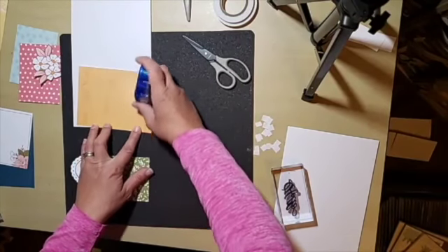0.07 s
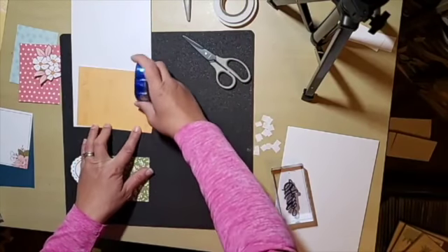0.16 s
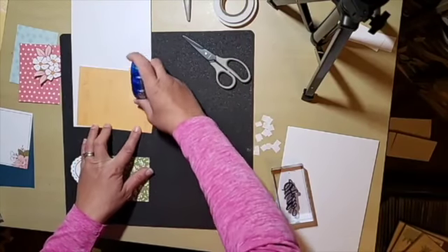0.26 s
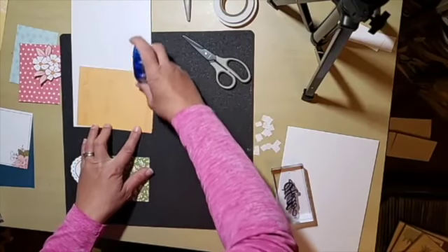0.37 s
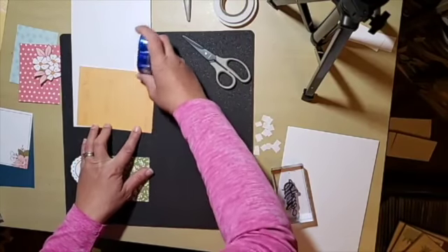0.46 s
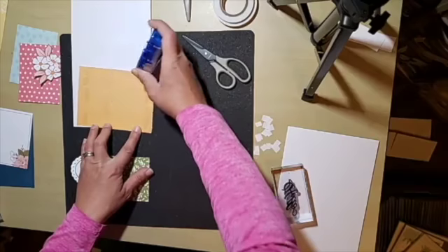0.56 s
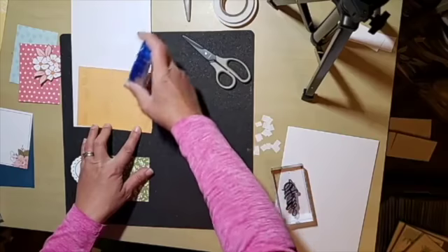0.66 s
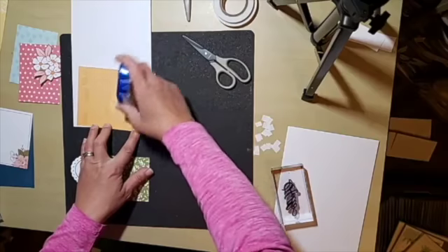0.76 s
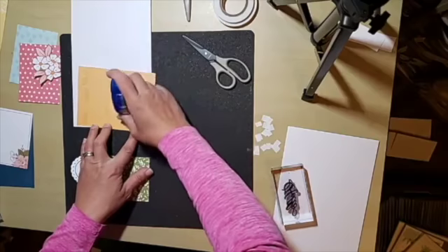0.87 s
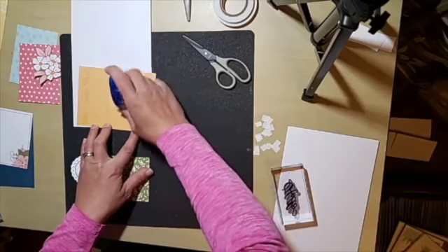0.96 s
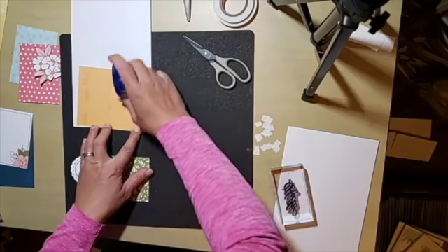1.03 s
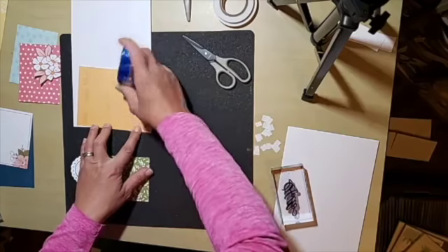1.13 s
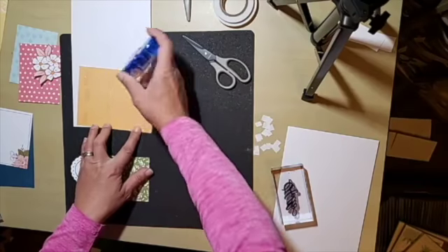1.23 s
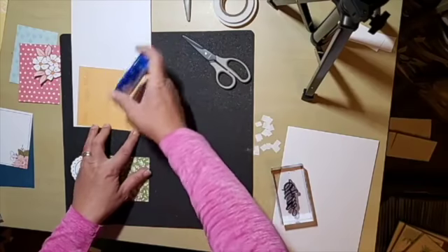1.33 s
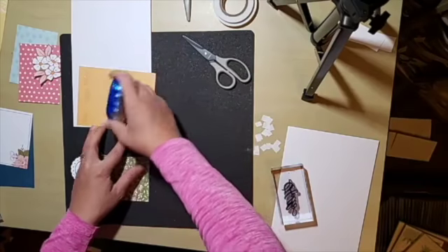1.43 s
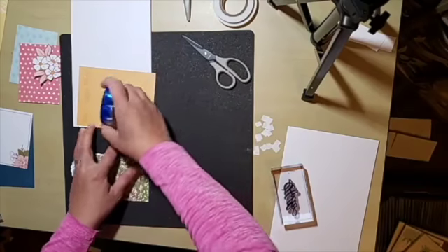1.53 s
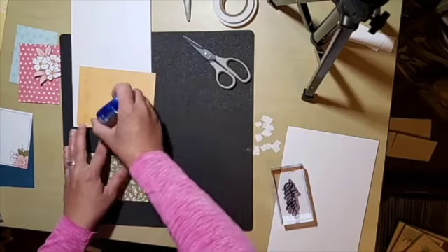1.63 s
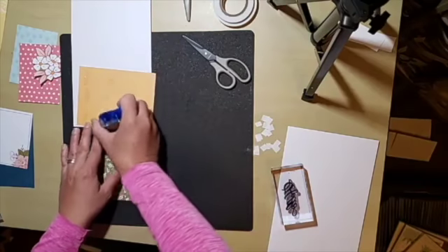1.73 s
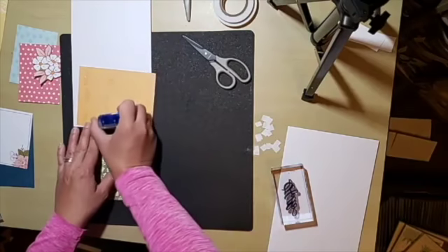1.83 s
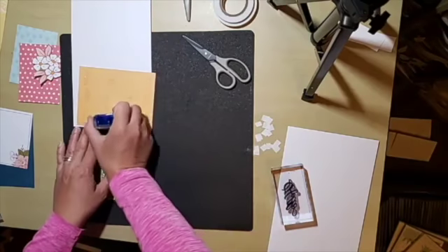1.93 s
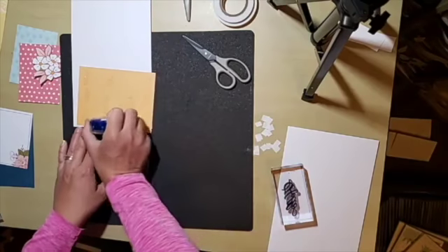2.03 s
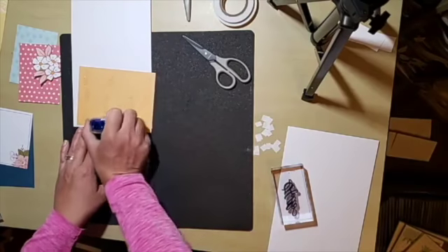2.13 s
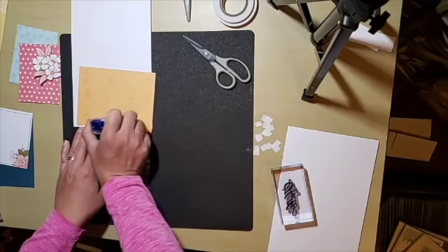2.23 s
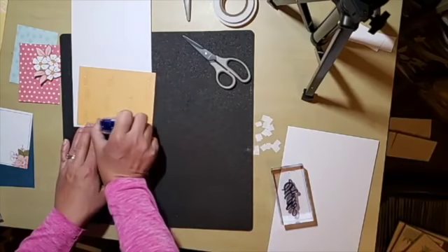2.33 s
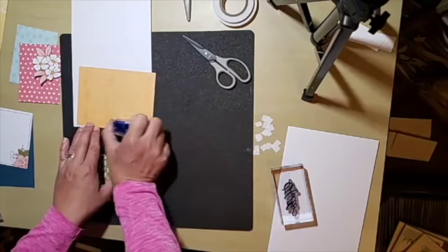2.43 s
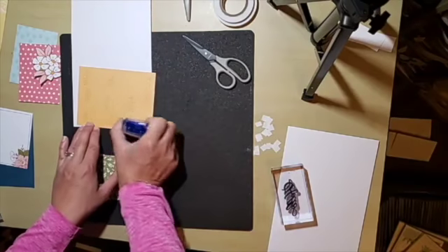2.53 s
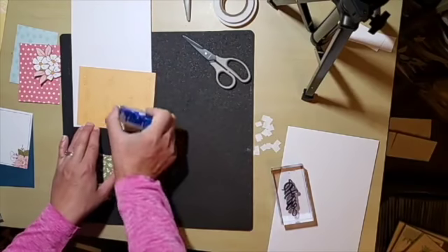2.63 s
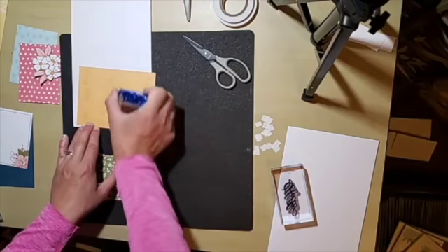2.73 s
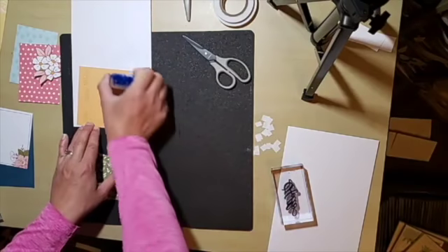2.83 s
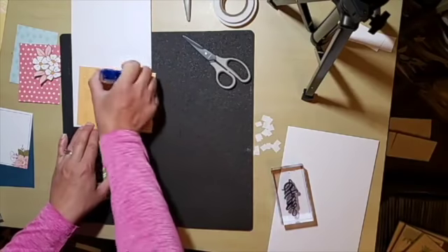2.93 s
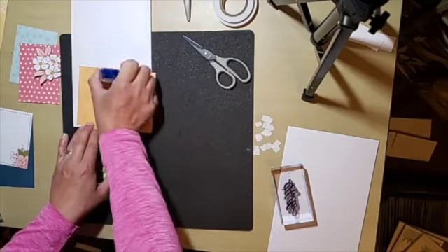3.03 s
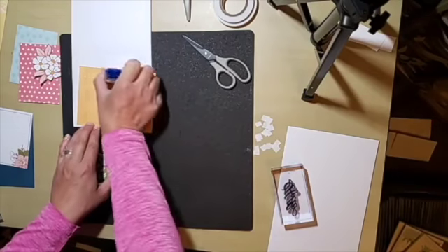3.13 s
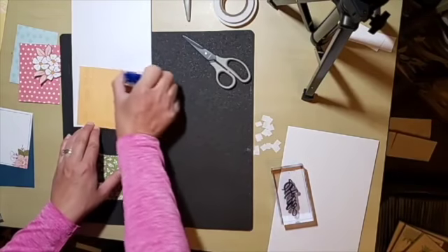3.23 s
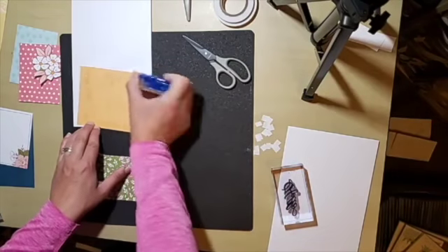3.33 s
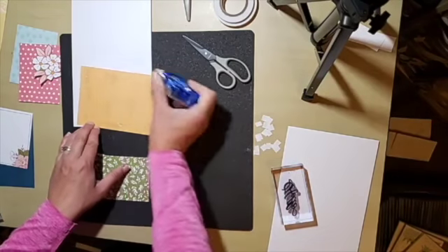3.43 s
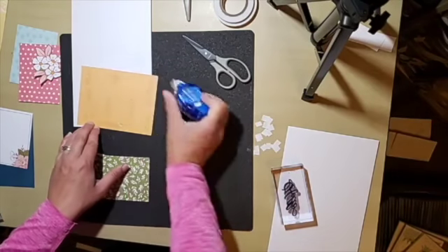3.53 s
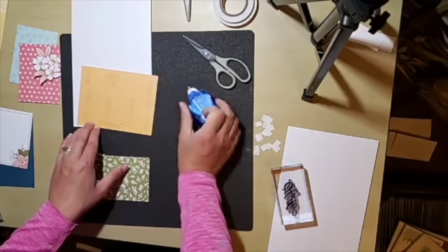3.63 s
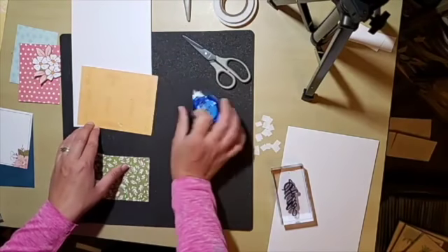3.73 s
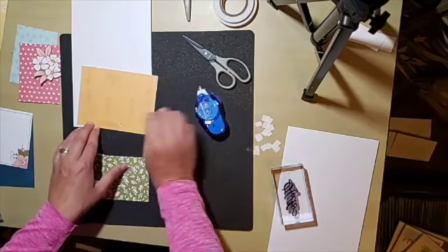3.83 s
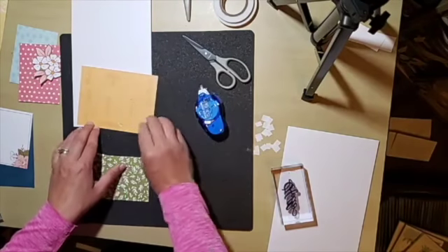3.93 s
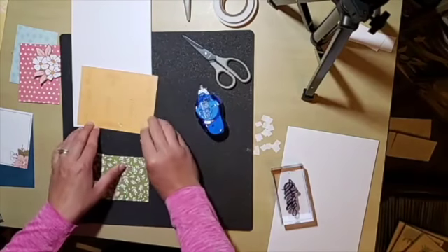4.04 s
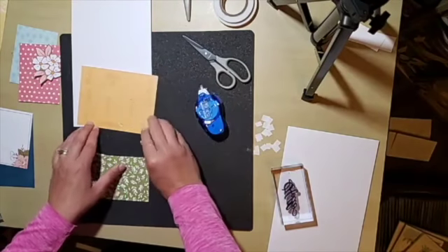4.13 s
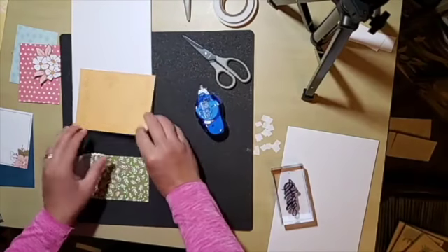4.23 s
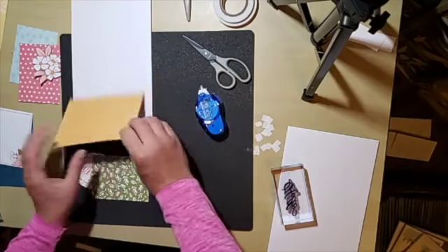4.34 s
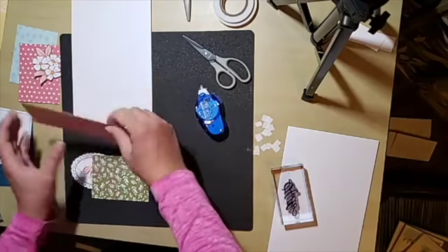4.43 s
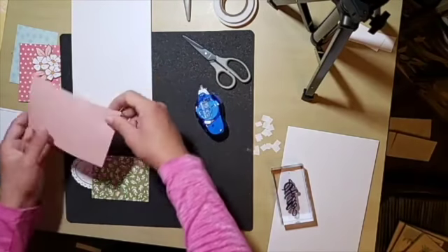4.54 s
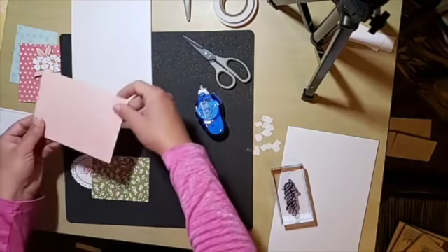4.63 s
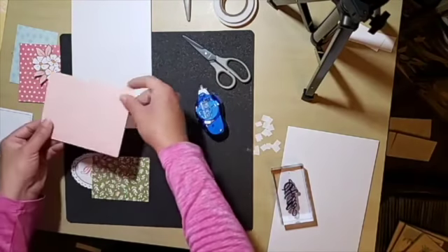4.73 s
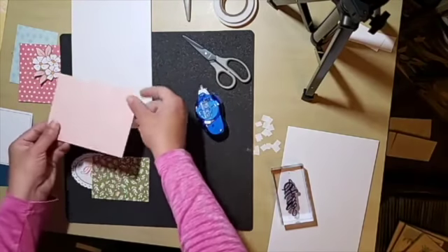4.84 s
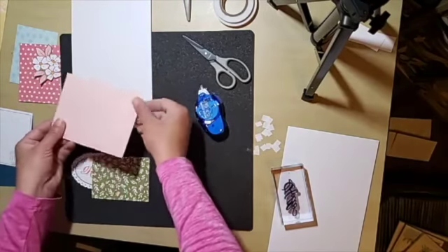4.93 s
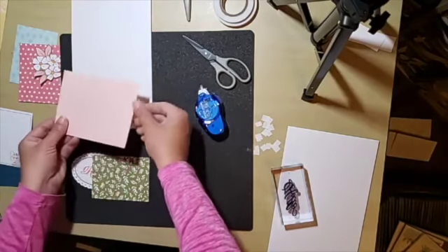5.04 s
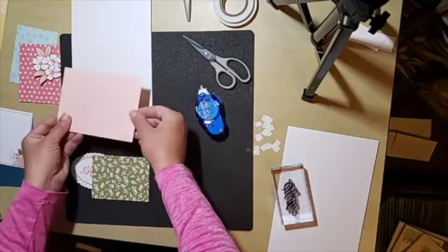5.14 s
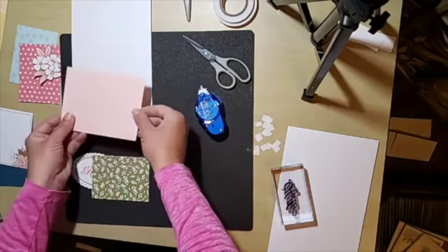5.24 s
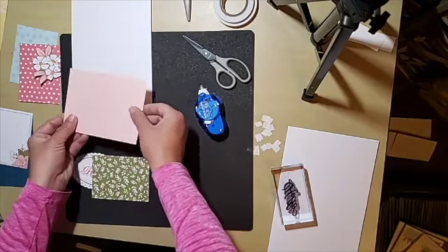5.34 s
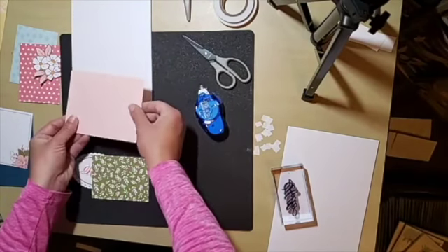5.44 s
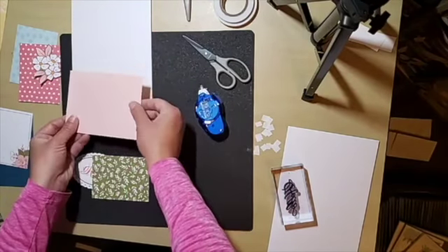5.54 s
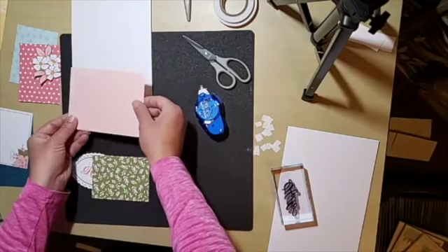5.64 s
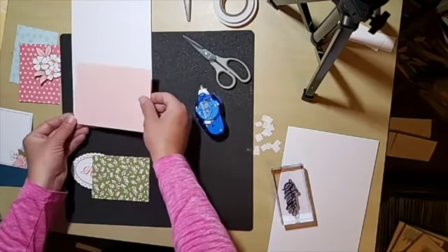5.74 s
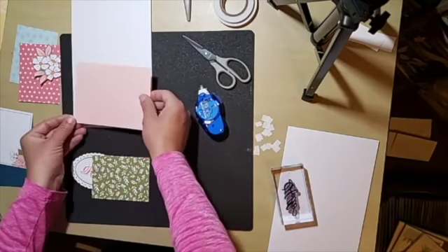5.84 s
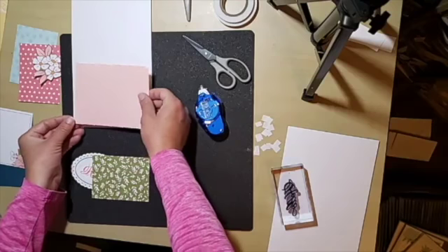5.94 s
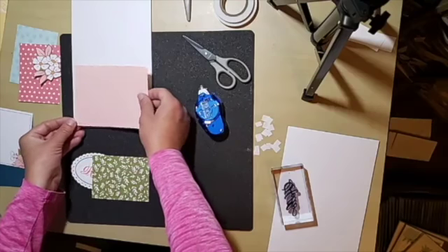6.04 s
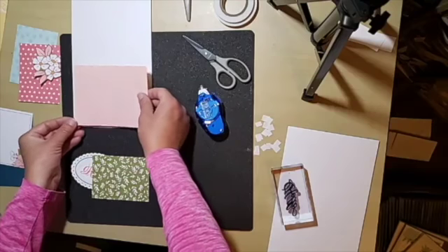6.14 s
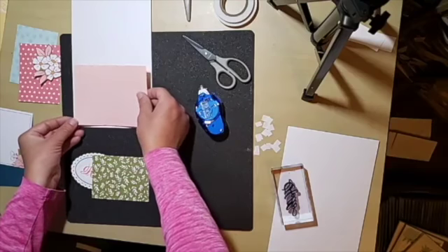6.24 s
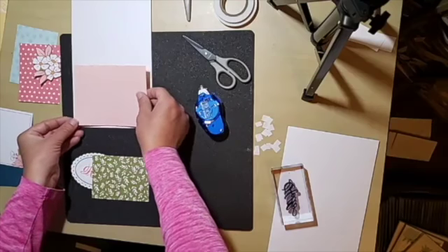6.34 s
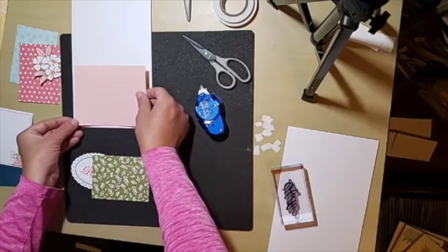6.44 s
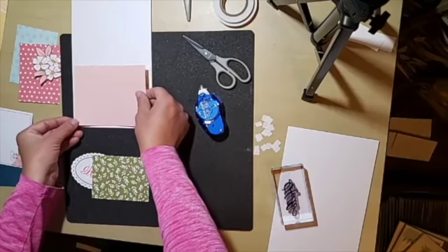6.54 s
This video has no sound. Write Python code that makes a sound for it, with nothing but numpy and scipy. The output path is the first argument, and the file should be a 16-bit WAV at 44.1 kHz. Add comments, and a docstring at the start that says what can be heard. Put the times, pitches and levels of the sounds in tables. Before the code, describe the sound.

Stereo microphones near a craft desk catch four quick zips of an adhesive roller after the tail of another, spaced unevenly, with ticks and rattles of its light plastic body. A firm double knock follows as it lands on the matted desk. Stiff card snaps up, papery rustles and soft slides follow, then almost nothing but low room tone.

```python
"""Tape runner and card on a desk

A plastic tape runner ends one stroke and makes four more along the edges of a card, in a small room.
Noise grains make the rasping gears and snapping glue; resonant bursts make roller squeaks and card flaps.
Struck modes make the case clicks and desk thumps. The card rubs as shaped friction noise and a hum."""
import sys
import numpy as np
from scipy import signal
from scipy.fft import rfft, irfft
from scipy.io import wavfile
from scipy.ndimage import uniform_filter1d

SR = 44100
rng = np.random.default_rng(int(sys.argv[2]) if len(sys.argv) > 2 else 0)


def master_out(mix):
    """Clip the mix to full scale and print it as 16-bit PCM to the path in sys.argv[1]."""
    frames = np.transpose(np.atleast_2d(mix))
    ceiling = np.clip(frames, -1, 1)
    pcm = np.round(ceiling * 32767).astype(np.int16)
    wavfile.write(sys.argv[1], SR, pcm)


N = 290619
TIME = np.arange(N) / SR   # s


def amp(db):
    """Decibels to gain."""
    return 10 ** (np.asarray(db) / 20)


def unit(x):
    """Scale to rms 1."""
    return x / np.sqrt(np.mean(x ** 2) + 1e-20)


def at_hz(points, hz):
    """Read a table on a log-frequency axis."""
    f, value = np.transpose(points)
    return np.interp(np.log(np.maximum(hz, 1)), np.log(f), value)


def colour(x, spectrum, size=8192):
    """Causal (minimum-phase) filter that keeps the power of white noise."""
    gain = unit(amp(at_hz(spectrum, np.linspace(0, SR / 2, size // 2 + 1))))
    cepstrum = irfft(np.log(gain))
    # fold the cepstrum to its causal half
    cepstrum[1:size // 2] *= 2
    cepstrum[size // 2 + 1:] = 0
    impulse_response = irfft(np.exp(rfft(cepstrum)))
    return signal.fftconvolve(x, impulse_response)[:N]


def high_pass(x, order, hz):
    """Butterworth high-pass."""
    return signal.sosfilt(signal.butter(order, hz, "high", fs=SR, output="sos"), x)


def ring(x, hz, t60_s):
    """Two-pole resonance: a unit click sets a decaying sine of initial height 1 ringing."""
    radius = np.exp(-np.log(1000) / (t60_s * SR))
    angle = 2 * np.pi * hz / SR
    poles = [1, -2 * radius * np.cos(angle), radius * radius]
    return signal.lfilter([0, np.sin(angle)], poles, x + 1e-18)


def band_noise(hz, width, size, order=1):
    """Noise in one resonance of the given relative width; rms 1."""
    edges_hz = [hz / (1 + width / 2), hz * (1 + width / 2)]
    sos = signal.butter(order, edges_hz, "band", fs=SR, output="sos")
    return unit(signal.sosfilt(sos, rng.standard_normal(size)))


def burst(shape, hz, width, order):
    """Resonant noise under an envelope, carrying exactly the envelope's energy."""
    noise = band_noise(hz, width, len(shape), order)
    return unit(shape * noise) * np.sqrt(np.mean(shape ** 2))


def grains(per_s, spread_db):
    """Tiny snaps at random moments, of random size and sign; rms 1."""
    sizes = amp(spread_db * np.clip(rng.standard_normal(N), -2, 2))
    signs = rng.choice([-1, 1], N)
    return unit(sizes * signs * (rng.random(N) < per_s / SR))


def drift(per_s):
    """Straight lines between normal random values drawn per_s times a second."""
    return np.interp(TIME * per_s, np.arange(N // 20), rng.standard_normal(N // 20))


def strikes(s, db):
    """One-sample blows at the given times."""
    out = np.zeros(N)
    out[np.round(np.asarray(s) * SR).astype(int)] = amp(db)
    return out


def add(out, s, sound):
    """Mix a short sound in from time s."""
    start = max(round(s * SR), 0)
    out[start:start + len(sound)] += sound[:N - start]


def glide(start_s, end_s, attack_s, release_s):
    """Speed of a stroke, 0-1: the hand eases in, holds its pace and eases out."""
    share = np.minimum((TIME - start_s) / attack_s, (end_s - TIME) / release_s)
    return np.sin(np.pi / 2 * np.clip(share, 0, 1))


PRESS_POWER = 1.59   # gain grows as this power of the pressure


def press(start_s, hardest_s, end_s):
    """Gain of a touch whose pressure grows evenly and is evenly let go."""
    return np.interp(TIME, [start_s, hardest_s, end_s], [0, 1, 0]) ** PRESS_POWER


def pan(x, left_db):
    """Lift the left side and cut the right by left_db."""
    return x * amp([[left_db], [-left_db]])


# relative noise floor spectrum: pitch_hz, level_db
FLOOR_COLOUR = [(15, -17), (32, 7.5), (55, 0), (90, -4), (125, -4), (190, -13), (320, -12.5), (500, -16),
                (1700, -18.5), (2800, -16.5), (6700, -22), (9000, -30.5), (13000, -17), (16000, -21.5)]
# mains hum: pitch_hz, rms_db
MAINS_HUM = [(59.5, -74.5), (119, -81.5)]
FLOOR_DB = -64


def background(side_db=-5):
    """Room rumble and hiss as coloured stereo noise, mains hum as steady sines."""
    mid, side = (colour(white, FLOOR_COLOUR) for white in rng.standard_normal((2, N)))
    hum = sum(amp(db) * np.sqrt(2) * np.sin(2 * np.pi * hz * TIME) for hz, db in MAINS_HUM)
    noise = mid + amp(side_db) * side * [[1], [-1]]
    return amp(FLOOR_DB) * noise + hum


# relative reverb level: pitch_hz, tail_db
TAIL_LEVEL = [(60, -34.5), (200, 3.5), (600, -8), (1200, -8), (3000, -7), (8000, -13.5), (16000, -13)]
# reverb decay: pitch_hz, t60_s
TAIL_T60 = [(100, 0.22), (1000, 0.27), (4000, 0.3), (8000, 0.41), (15000, 0.24)]


def room(x, size=24000):
    """The walls ring on after 6 ms, dying band by band."""
    t, edges_hz = np.arange(size) / SR, np.geomspace(60, 19000, 10)
    tail = np.zeros((2, size))
    for low, high in zip(edges_hz, edges_hz[1:]):
        hz = np.sqrt(low * high)
        sos = signal.butter(2, [low, high], "band", fs=SR, output="sos")
        band = signal.sosfilt(sos, rng.standard_normal((2, size)))
        decay = np.exp(-np.log(1000) * t / at_hz(TAIL_T60, hz)) * (t > .006)
        tail += amp(at_hz(TAIL_LEVEL, hz)) * band * decay / np.linalg.norm(decay)
    return signal.fftconvolve(x, tail, axes=1)[:, :N]


def scatter(x, spread_s=0.0055, changes_per_s=35, count=7, size=1024):
    """Reflections off hands and desk: the mix of paths keeps changing as the hands move."""
    t, out = np.arange(size) / SR, 0
    bright = high_pass(x, 2, 900)
    decay = np.exp(-t / spread_s)
    weights = np.array([drift(changes_per_s) for _ in range(count)])
    for weight in weights / np.linalg.norm(weights, axis=0):
        paths = rng.standard_normal((2, size)) * decay / np.linalg.norm(decay)
        out = out + signal.oaconvolve(weight * bright, paths, axes=1)[:, :N]
    return out


def direct(x, treble_loss=0.51, lag_samples=6):
    """The straight path, its treble shaded by the hand, reaches the left side first."""
    left, right = x - treble_loss * high_pass(x, 1, 1200)
    return np.array([left, np.pad(right, (lag_samples, 0))[:N]])


# landings of hand, runner or card: hit_s, level_db, contact_s, rebound_delay_s
THUMPS = [(0.153, -43.5, 0.0087, 0.029), (0.83, -51, 0.006, 0.024), (2.031, -42, 0.013, 0.035),
          (2.948, -41, 0.0041, 0.037), (3.652, -27.5, 0.0031, 0.031), (3.72, -31.5, 0.0047, 0.041),
          (4.318, -45.5, 0.0057, 0.02)]
# desk top modes: pitch_hz, level_db, t60_s
DESK_MODES = [(82.3, 0.5, 0.46), (97, -34, 0.096), (103.6, 1, 0.23), (141, -12, 0.49), (198.2, -5.5, 0.24),
              (245, -16, 0.24), (307, -8, 0.11), (401, 0.5, 0.044)]
# hands leaning on the desk: start_s, hardest_s, end_s, rumble_db
LEANING = [(-5.5, 0.92, 3.1, -63.5), (1.5, 2.56, 2.76, -59), (3.5, 3.584, 4.17, -49)]
REBOUND_DB = -4.5   # re first contact


def desk(rumble_hz=62):
    """Rounded pushes through the soft mat ring the desk; shorter ones reach higher modes. Leaning rumbles."""
    force = np.zeros(N)
    for s, db, contact_s, rebound_s in THUMPS:
        push = np.hanning(max(round(contact_s * SR), 3))
        push = push / push.sum()
        add(force, s - contact_s / 2, amp(db) * push)
        add(force, s + rebound_s - contact_s / 2, amp(db + REBOUND_DB) * push)
    boom = sum(amp(db) * ring(force, hz, t60_s) for hz, db, t60_s in DESK_MODES)
    weight = sum(amp(db) * press(start, hardest, end) for start, hardest, end, db in LEANING)
    return boom + weight * band_noise(rumble_hz, 0.9, N, order=2)


# fingers and card rubbing: start_s, hardest_s, end_s, relative friction_db, sheet_hum_db
RUBS = [(1.743, 1.798, 2.35, -52, -64.5), (3.484, 3.615, 3.84, -40.5, -59.5),
        (3.95, 4.176, 4.33, -59.5, -86), (4.187, 4.234, 4.27, -47.5, -80), (4.402, 4.556, 4.75, -43.5, -64),
        (4.637, 4.87, 5.016, -49, -57.5), (5.498, 5.586, 5.73, -49.5, -56), (5.6, 5.79, 5.99, -66, -67.5)]
# relative friction spectrum: pitch_hz, level_db
RUB_COLOUR = [(300, -53), (550, -17.5), (900, -27.5), (1350, -12.5), (1900, -15), (2400, -3.5), (3600, -7),
              (6200, -4), (8700, -18.5), (12500, -8), (16000, -15)]
SHEET_HZ, SHEET_WIDTH = 1380, 0.49   # bending resonance, relative width


def rubbing(friction_trim_db=-3, flutter_db=2):
    """Paper fibres catch and let go under a sliding touch, and the sheet hums along."""
    friction, bending = 0, 0
    for start, hardest, end, friction_db, sheet_db in RUBS:
        touch = press(start, hardest, end)
        friction = friction + amp(friction_db + friction_trim_db) * touch
        bending = bending + amp(sheet_db) * touch
    fibres = colour(grains(per_s=4000, spread_db=2.5), RUB_COLOUR)
    sheet = band_noise(SHEET_HZ, SHEET_WIDTH, N, order=2)
    return amp(flutter_db * drift(90)) * (friction * fibres + bending * sheet)


# card flexing and flapping: peak_s, level_db, pitch_hz, decay_s (to 1/e), edge_db re flap
FLAPS = [(4.312, -28, 954, 0.006, -7), (4.315, -35, 573, 0.023, -0.5), (4.355, -45, 820, 0.0086, 0.5),
         (4.461, -45, 680, 0.022, -7.5), (4.542, -47.5, 732, 0.012, 7.5), (4.581, -46, 665, 0.012, 6),
         (4.598, -46.5, 456, 0.011, 0.5), (4.921, -35.5, 1230, 0.0081, -6), (5.064, -56.5, 1230, 0.021, -3),
         (5.239, -68.5, 1500, 0.032, 3), (5.316, -61, 1460, 0.013, -10), (5.535, -44.5, 1430, 0.0043, -4.5),
         (5.626, -50.5, 1420, 0.027, -5)]
# relative edge crackle spectrum: pitch_hz, level_db
CARD_COLOUR = [(250, -7), (500, 3), (1300, -1.5), (2500, 1.5), (5000, -0.5), (7000, -2.5), (9000, -10.5),
               (13000, -60), (16000, -46)]
FLAP_SWELL_S = 0.0043


def card(width=0.52, size=24000):
    """Each flap swells quickly and dies in a broad bending resonance, with crackle from the edge."""
    out, crisp = np.zeros(N), np.zeros(N)
    t = (np.arange(size) - size // 4) / SR
    for s, db, hz, decay_s, edge_db in FLAPS:
        shape = amp(db) * np.exp(np.minimum(t / FLAP_SWELL_S, -t / decay_s))
        add(out, s + t[0], burst(shape, hz, width, order=3))
        add(crisp, s + t[0], shape * amp(edge_db))
    return out + colour(crisp * grains(per_s=4800, spread_db=2.0), CARD_COLOUR)


# plastic case clicks: hit_s, relative ring_db, relative crack_db, favoured_hz (by the touch)
CLICKS = [(0.504, -44, -29.5, 2000), (0.8535, -44, -32, 1690), (0.862, -52, -17.5, 1700),
          (0.885, -37, -26, 1570), (1.589, -38, -39, 2210), (1.801, -33, -30, 1730),
          (1.856, -46, -36, 1600), (1.869, -48, -29, 1780), (1.923, -33, -32.5, 1760),
          (2.032, -38, -32.5, 1500), (2.067, -36.5, -32.5, 1520), (2.115, -40, -42.5, 1710),
          (2.137, -41, -37.5, 1790), (2.178, -35.5, -14, 1890), (2.204, -19, -16, 1970),
          (2.585, -32.5, -39, 1540), (2.637, -28.5, -21.5, 1920), (3.051, -57, -19.5, 2000),
          (3.073, -44, -14, 1800), (3.329, -29, -30.5, 2030), (3.573, -37, -26, 2240),
          (3.6512, -21.5, -10.5, 1530), (3.715, -33, -22, 1420)]
# hollow case modes: pitch_hz, relative level_db, t60_s
CASE_MODES = [(1134, 0.5, 0.037), (1395, -3, 0.034), (1573, 3, 0.018), (1800, 3.5, 0.018),
              (2020, -10.5, 0.019), (2010, 1.5, 0.022), (2255, 6.5, 0.039), (2570, 5, 0.018),
              (3740, 5, 0.03)]
# relative crack spectrum: pitch_hz, level_db
CRACK_COLOUR = [(500, -17.5), (1200, -24), (2800, 4.5), (4200, 9), (6500, 8.5), (8600, -5), (11000, -4.5),
                (14000, 4), (16000, -13)]


def case_clicks(ring_trim_db=-5, crack_trim_db=-4, crack_s=0.0018, slope_db_per_octave=20):
    """A short noise crack plus the hollow case ring; modes weaken away from the favoured pitch."""
    s, ring_db, crack_db, favoured_hz = np.transpose(CLICKS)
    rings = 0
    for k, (hz, db, t60_s) in enumerate(CASE_MODES):
        octaves = np.abs(np.log2(hz / favoured_hz))
        strength_db = ring_db + db - slope_db_per_octave * octaves + rng.normal(0, 1, len(s))
        rings = rings + (-1) ** k * ring(strikes(s, strength_db), hz, t60_s)
    decay = np.exp(-1 / (crack_s * SR))
    chatter = signal.lfilter([1], [1, -decay], strikes(s, crack_db) + 1e-18)
    chatter = uniform_filter1d(chatter, size=130)   # loose parts do not all touch at once
    cracks = colour(chatter * rng.standard_normal(N), CRACK_COLOUR)
    return amp(ring_trim_db) * rings + amp(crack_trim_db) * cracks


# roller catches and squeaks: centre_s, pitch_hz, level_db, length_s (Gaussian sigma)
SQUEAKS = [(0.284, 4400, -30, 0.029), (0.318, 4100, -30.5, 0.011), (0.351, 3370, -33, 0.011),
           (0.908, 1650, -31, 0.0085), (2.384, 800, -53, 0.035), (2.428, 3370, -31, 0.015),
           (3.085, 4150, -37.5, 0.019), (3.235, 2970, -29, 0.0055)]


def squeaks(width=0.082, size=8192):
    """Brief stick-slip tones of the roller: narrow noise under a Gaussian envelope."""
    out, t = np.zeros(N), (np.arange(size) - size / 2) / SR
    for s, hz, db, length_s in SQUEAKS:
        shape = amp(db) * np.exp(-.5 * (t / length_s) ** 2)
        add(out, s + t[0], burst(shape, hz, width, order=2))
    return out


# runner strokes, the first already ending: start_s, end_s, attack_s, release_s,
# relative rasp_db, glue_db
STROKES = [(-0.1, 0.066, 0.02, 0.2, -35.5, -34), (0.205, 0.442, 0.091, 0.12, -25.5, -20),
           (0.869, 1.061, 0.059, 0.057, -28.5, -22), (2.195, 2.491, 0.013, 0.047, -28, -24),
           (3.042, 3.265, 0.1, 0.062, -25, -20.5)]
# grip colour per stroke: hollow_db, peak_hz, peak_db, dip_hz, dip_db (either sign), upper_db
GRIPS = [(-2, 5200, 0, 2300, 7, -1.5), (4.5, 3800, 2.5, 1910, -9, 0), (4, 1590, 2.5, 2760, -7, 0.5),
         (0, 3400, -1.5, 1966, -17, 1), (1, 4040, 3.5, 2400, 3.5, 1)]
# relative gear spectrum: pitch_hz, level_db
RASP_COLOUR = [(240, -41), (600, -29.5), (800, -23.5), (1150, -10), (1550, -5), (2000, -3), (2800, -1),
               (4200, 3.5), (5000, -0.5), (7000, 0), (8500, -8), (10000, -35), (13000, -12.5)]
# relative glue spectrum: pitch_hz, level_db
GLUE_COLOUR = [(6000, -40), (8500, -16), (9500, -8), (11000, -6), (12500, -2), (14000, 0), (15500, 1),
               (16500, 0)]
RASP_POWER, GLUE_POWER, HOLLOW_POWER = 1.14, 1, 1.5   # gain grows as these powers of the speed
HOLLOW_BELOW_HZ = 1800
WEIGHT_LAG_S = 0.011   # the hand's weight, sounding the hollow case, comes and goes late


def strokes(teeth_hz=130, tooth_depth=0.19, flutter_db=1.0, rasp_trim_db=-0.5, breadth=0.06):
    """Gears rasp and glue strands snap, louder and fuller with speed; the uneven spool pulses the pull."""
    turn = np.cumsum(teeth_hz * amp(2 * drift(15))) / SR   # teeth passed
    pull = (1 + tooth_depth * np.sin(2 * np.pi * turn)) * amp(flutter_db * drift(400))
    teeth = pull * grains(per_s=4500, spread_db=1.5)
    strands = colour(pull * grains(per_s=3500, spread_db=2), GLUE_COLOUR)
    hz = np.geomspace(200, 16000, 160)
    low_pass = signal.butter(2, HOLLOW_BELOW_HZ, fs=SR, output="sos")
    out = 0
    for stroke, grip in zip(STROKES, GRIPS):
        start, end, attack, release, rasp_db, glue_db = stroke
        hollow_db, peak_hz, peak_db, dip_hz, dip_db, upper_db = grip
        speed = glide(start, end, attack, release)
        weight = glide(start + WEIGHT_LAG_S, end + WEIGHT_LAG_S, attack, release)
        tilt = at_hz([(1600, hollow_db), (3000, 0), (6500, upper_db)], hz)
        cupped = sum(db * np.exp(-(np.log(hz / centre) / breadth) ** 2)
                     for centre, db in [(peak_hz, peak_db), (dip_hz, dip_db)])
        gears = colour(teeth, np.column_stack([hz, at_hz(RASP_COLOUR, hz) + tilt + cupped]))
        body = signal.sosfiltfilt(low_pass, gears)
        rasp = speed ** RASP_POWER * (gears - body) + weight ** HOLLOW_POWER * body
        out = out + amp(rasp_db + rasp_trim_db) * rasp
        out = out + amp(glue_db) * speed ** GLUE_POWER * strands
    return out


RUNNER_LEFT_DB, CASE_LEFT_DB, DESK_LEFT_DB, CARD_LEFT_DB = 0.55, 0.9, 2.35, 1.07


def scene(scatter_db=-1.5):
    """Runner, desk and card, a little left of centre, in the room."""
    runner = pan(strokes() + squeaks(), RUNNER_LEFT_DB)
    case = pan(case_clicks(), CASE_LEFT_DB)
    thumps = pan(desk(), DESK_LEFT_DB)
    paper = pan(card() + rubbing(), CARD_LEFT_DB)
    x = runner + case + thumps + paper
    return direct(x) + amp(scatter_db) * scatter(x) + room(x) + background()


def record(dry, low_cut_hz=40, cutoff_hz=16000):
    """The microphones lose the deepest bass; the top is cut steeply."""
    lean = high_pass(dry, 2, low_cut_hz)
    return signal.sosfilt(signal.ellip(12, .1, 80, cutoff_hz, fs=SR, output="sos"), lean)


dry = scene()
out = record(dry)
master_out(out)
```